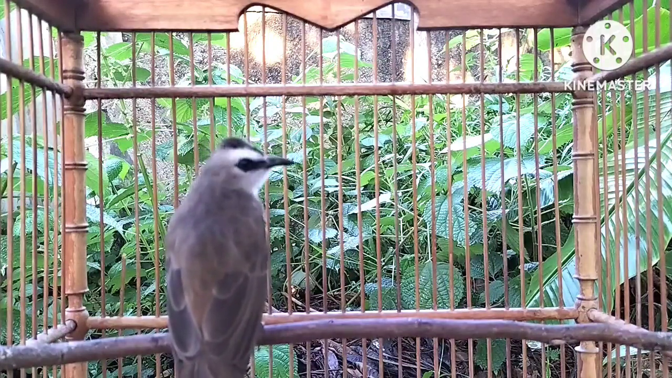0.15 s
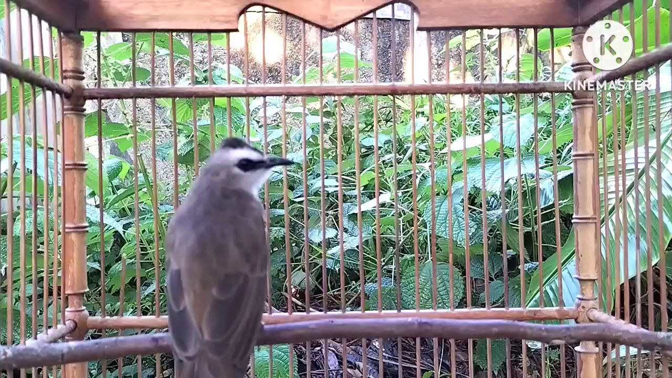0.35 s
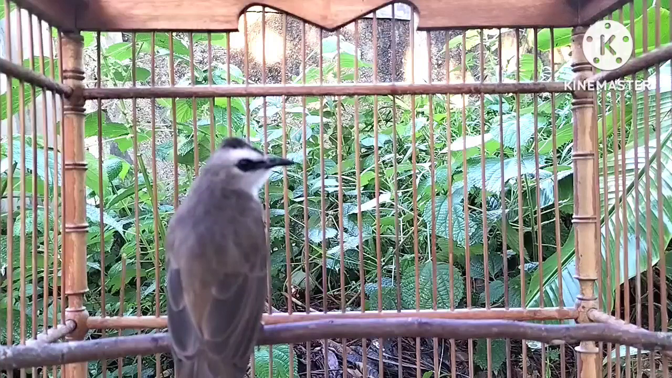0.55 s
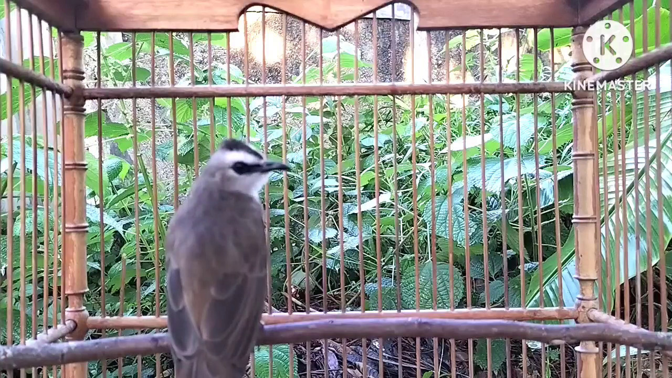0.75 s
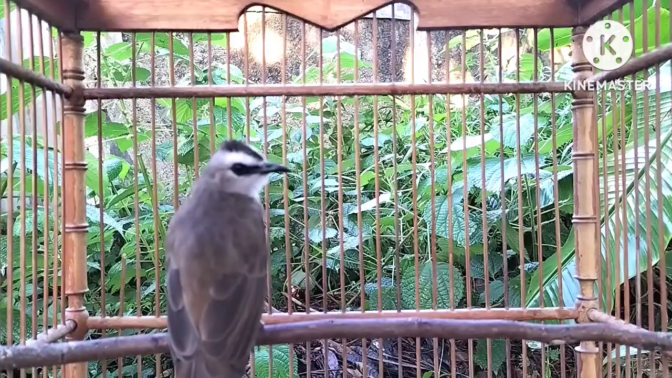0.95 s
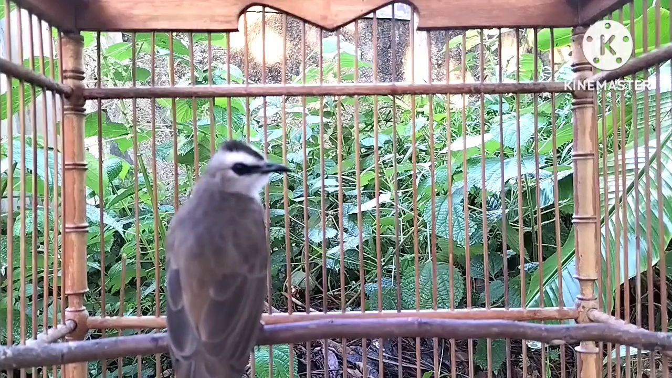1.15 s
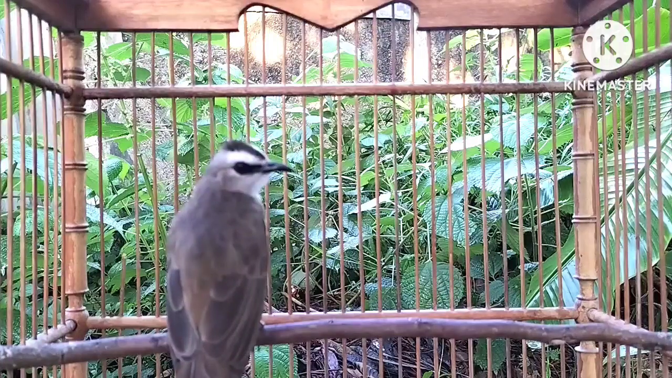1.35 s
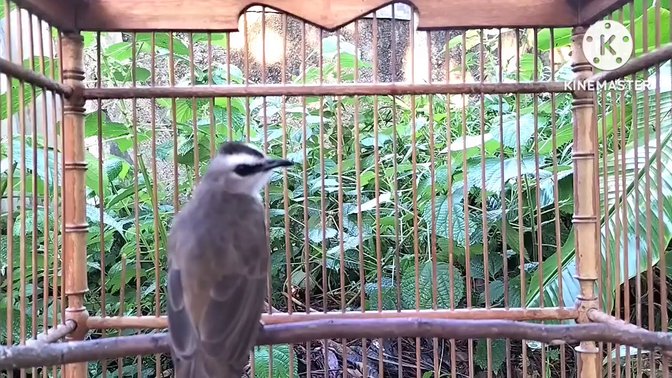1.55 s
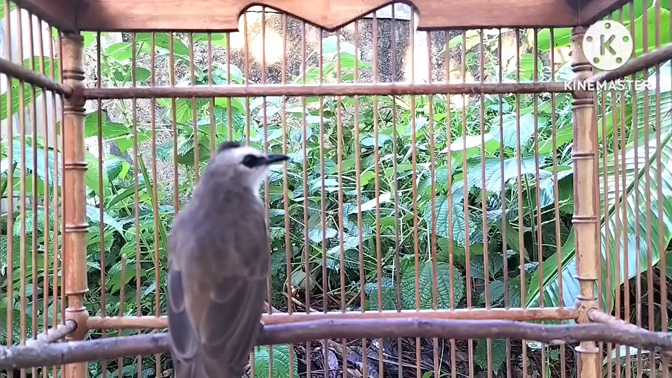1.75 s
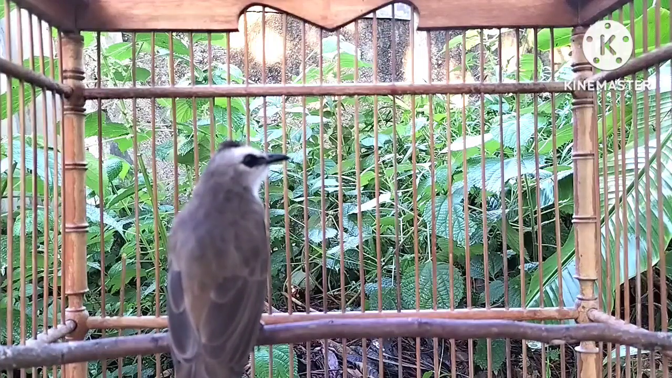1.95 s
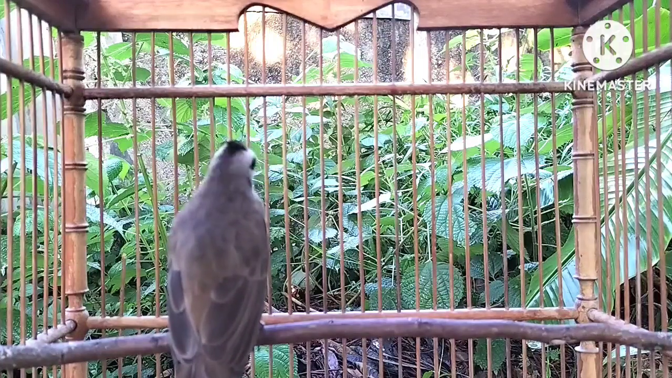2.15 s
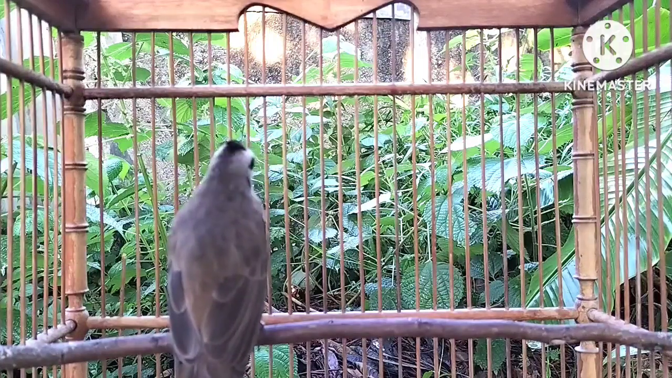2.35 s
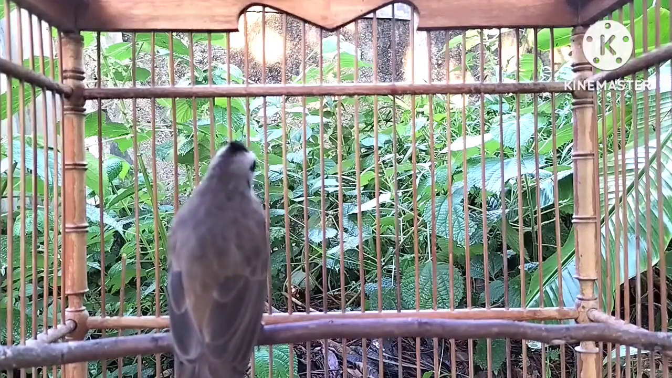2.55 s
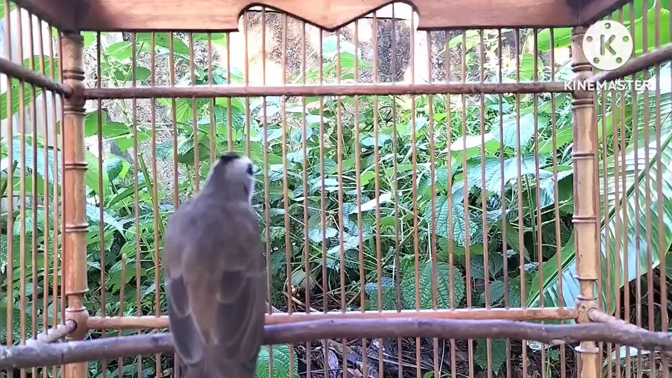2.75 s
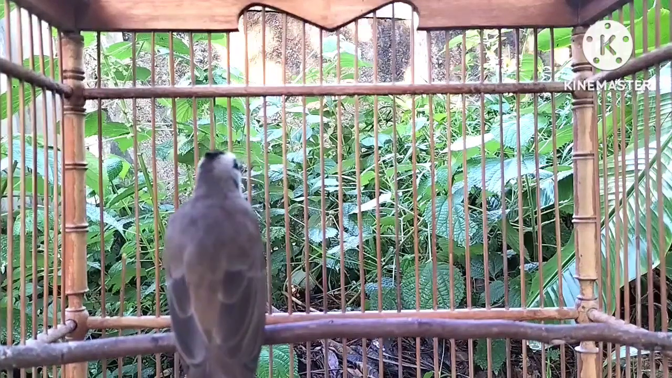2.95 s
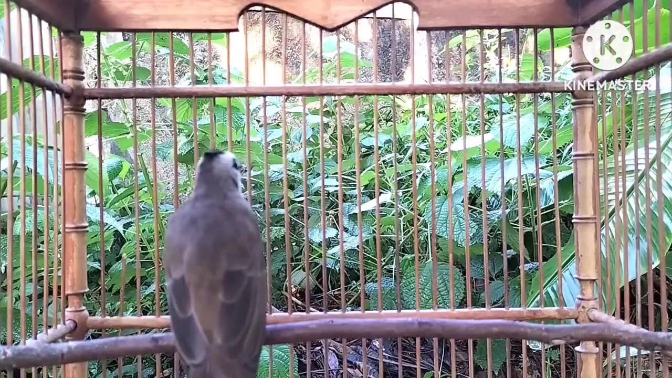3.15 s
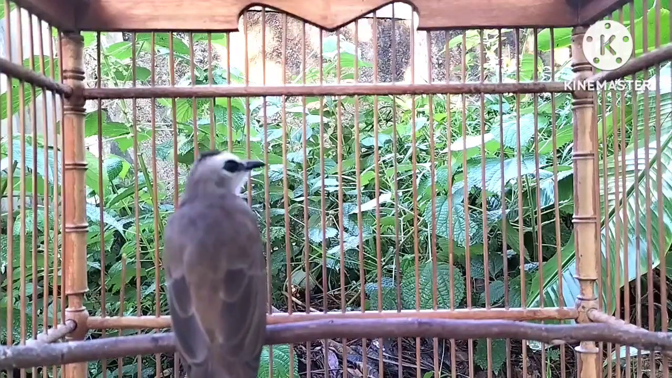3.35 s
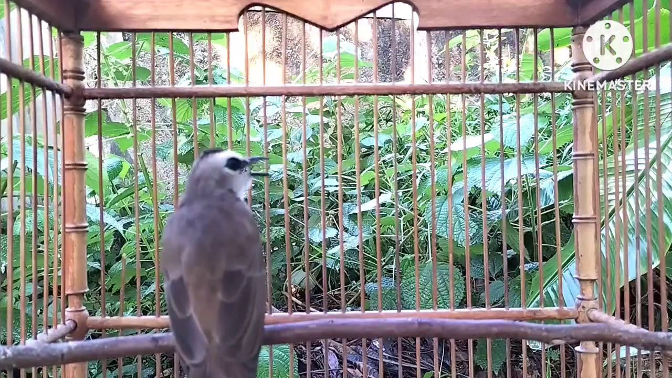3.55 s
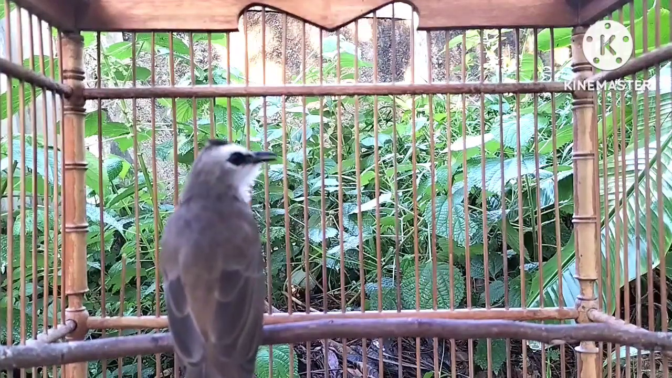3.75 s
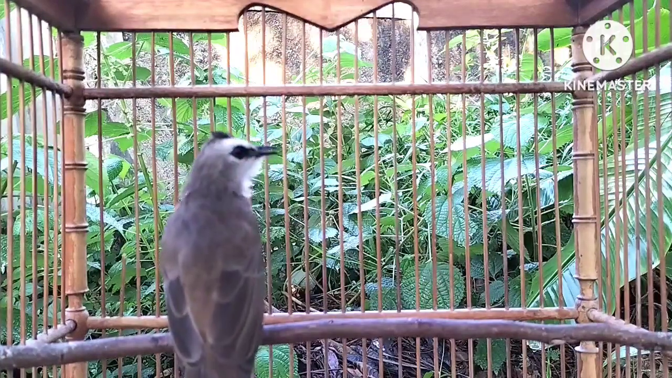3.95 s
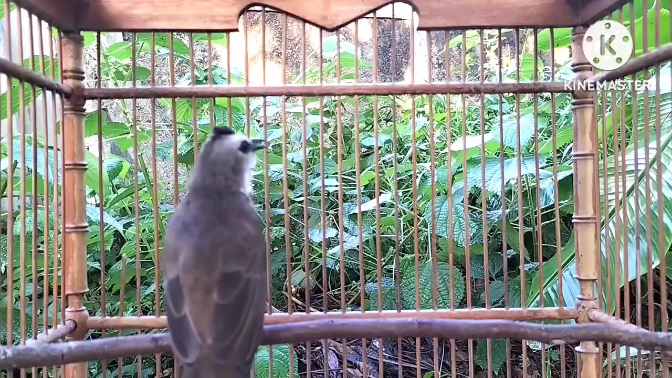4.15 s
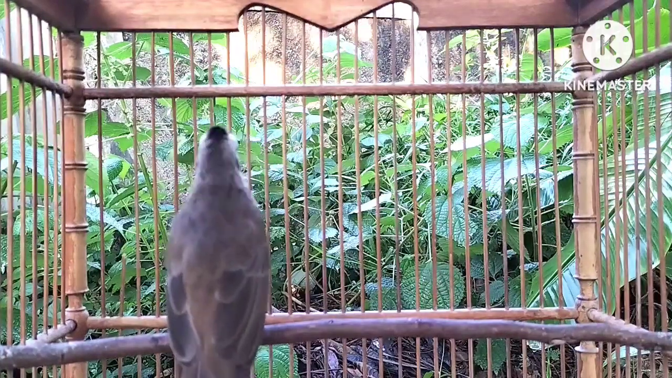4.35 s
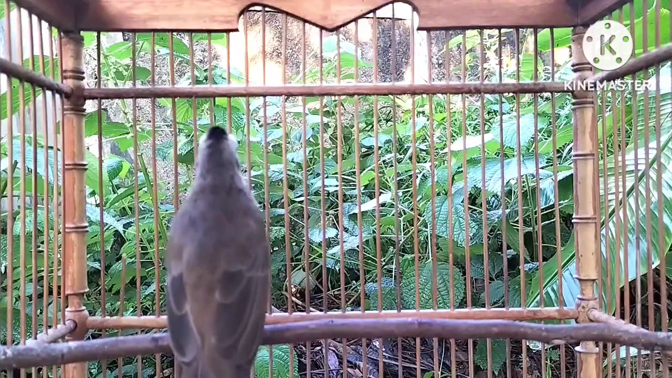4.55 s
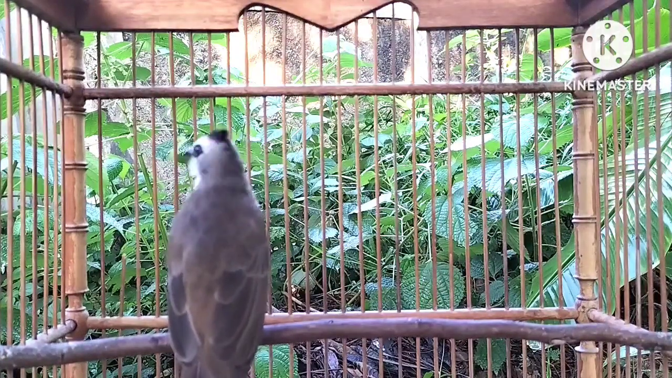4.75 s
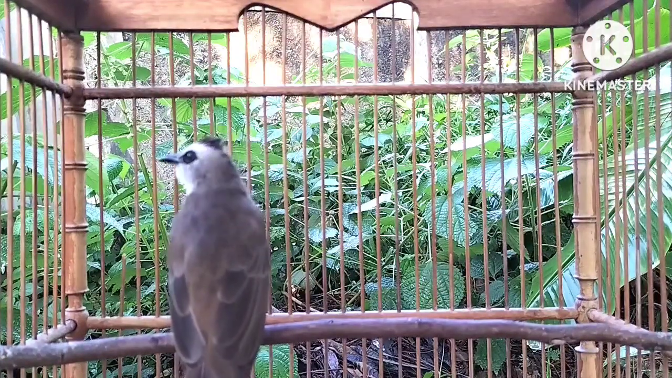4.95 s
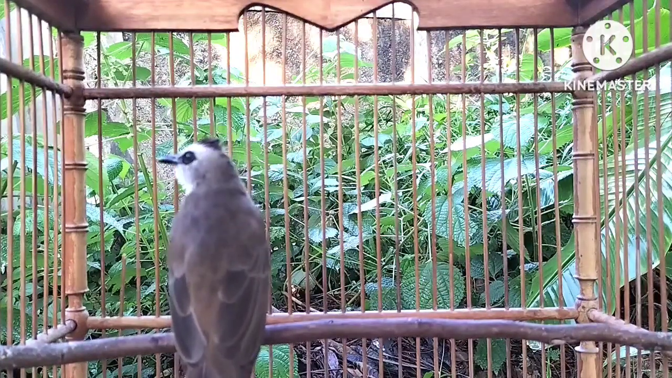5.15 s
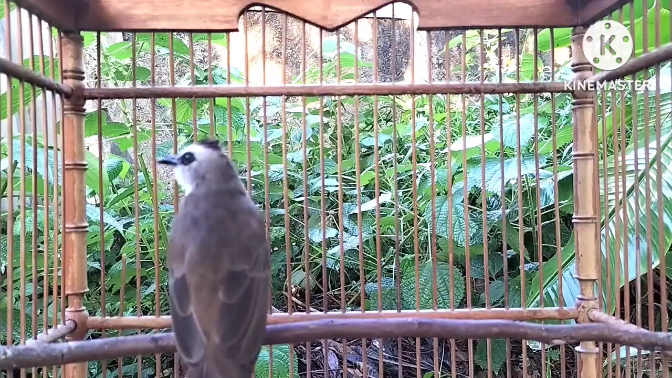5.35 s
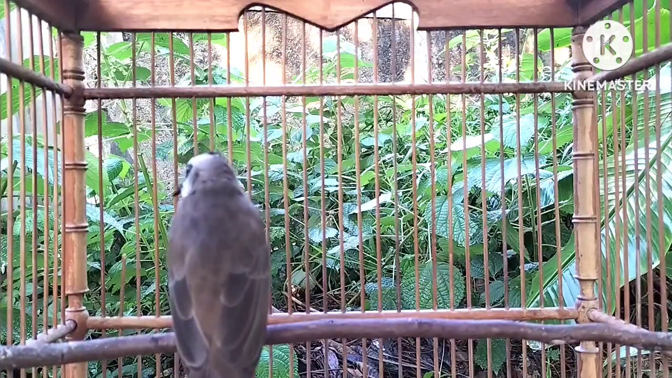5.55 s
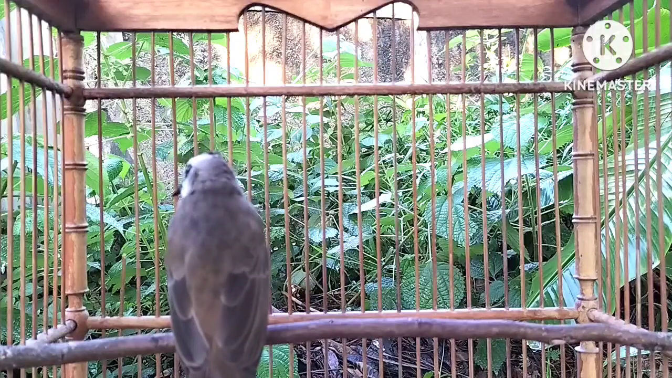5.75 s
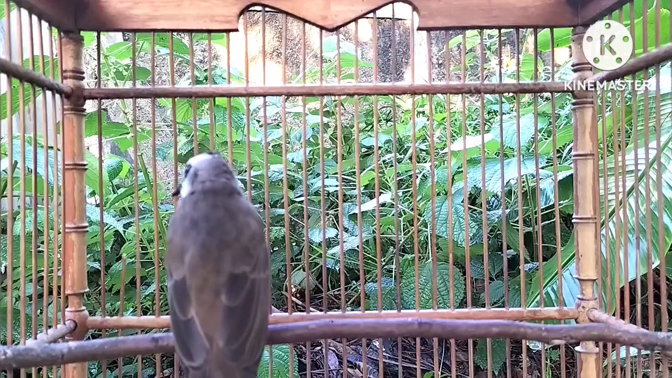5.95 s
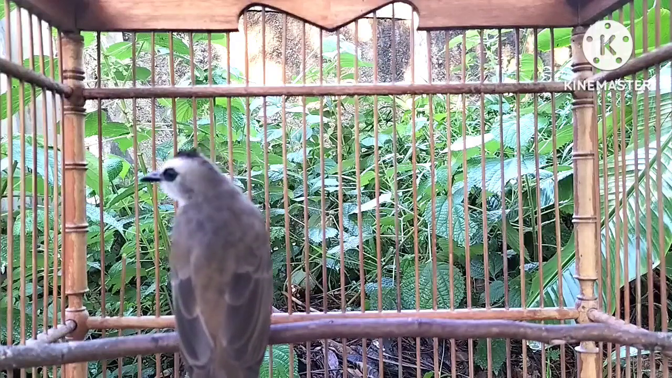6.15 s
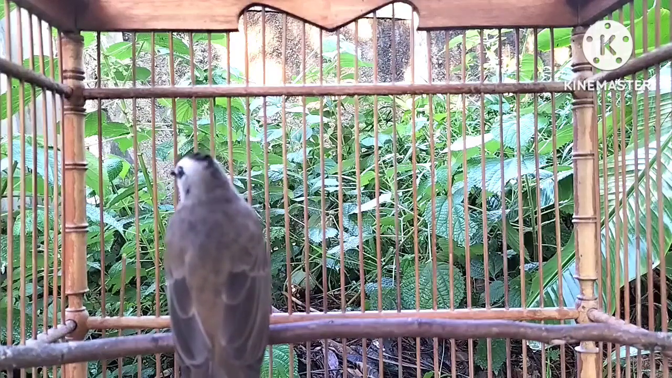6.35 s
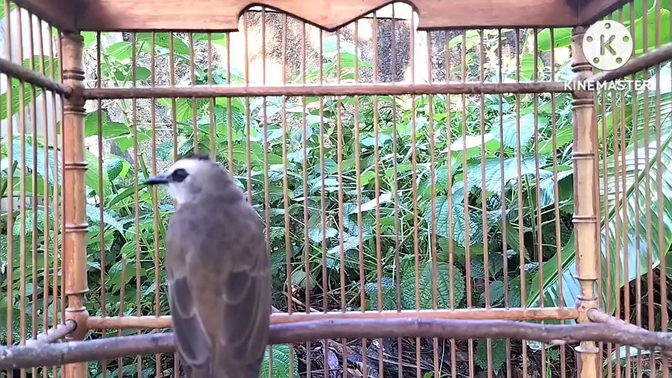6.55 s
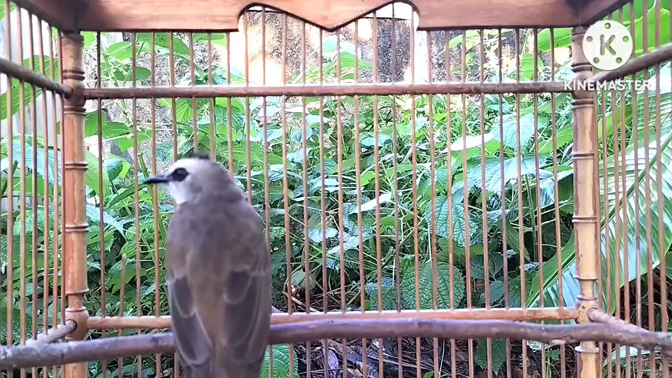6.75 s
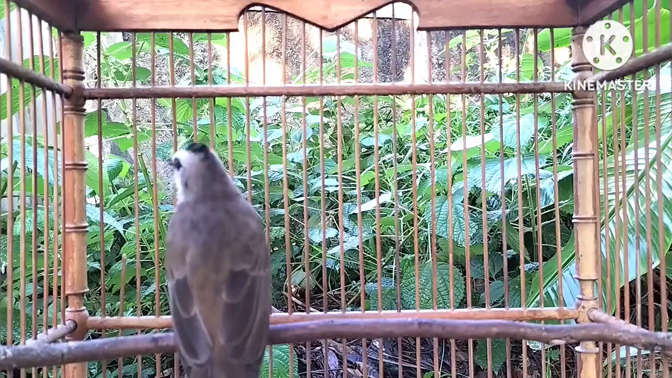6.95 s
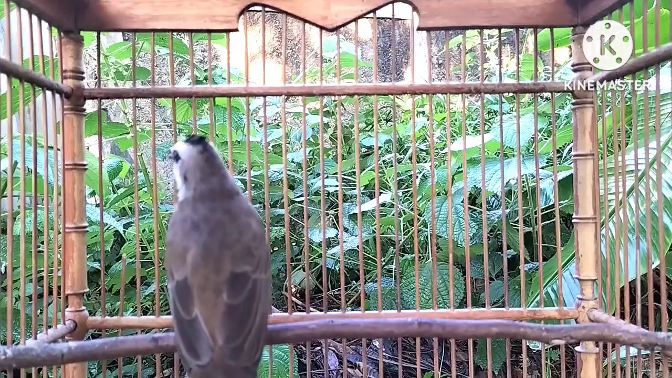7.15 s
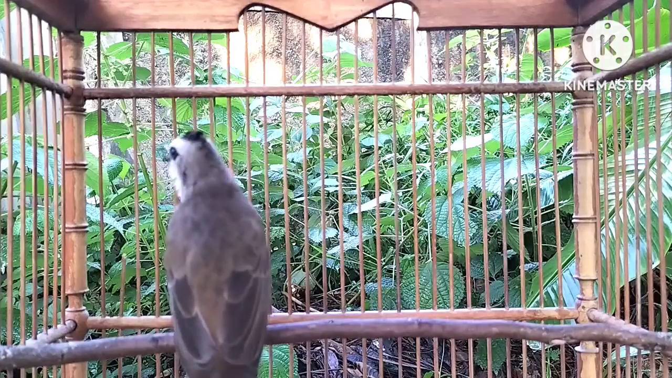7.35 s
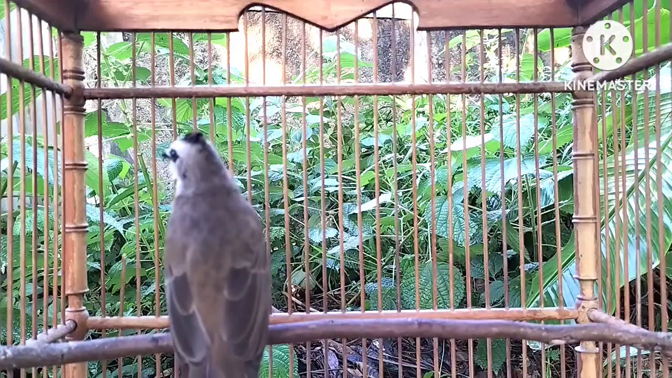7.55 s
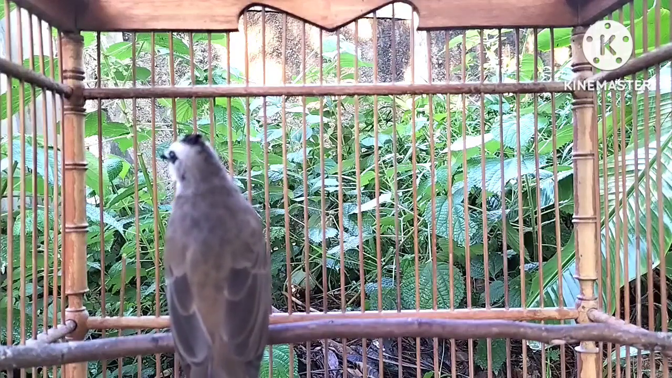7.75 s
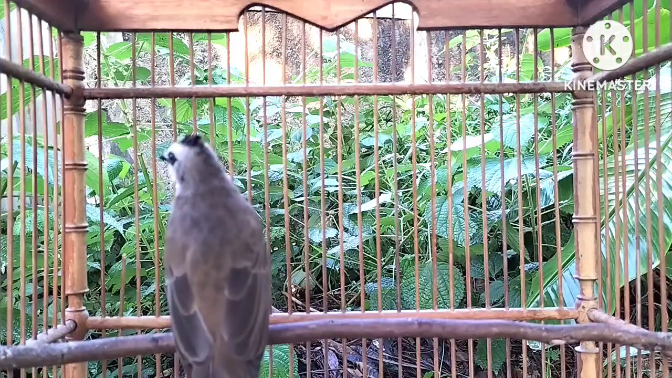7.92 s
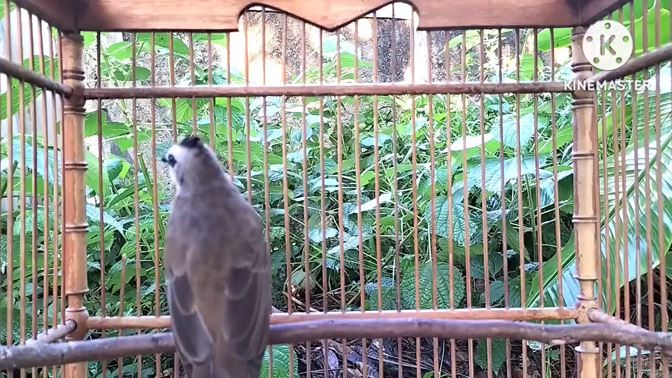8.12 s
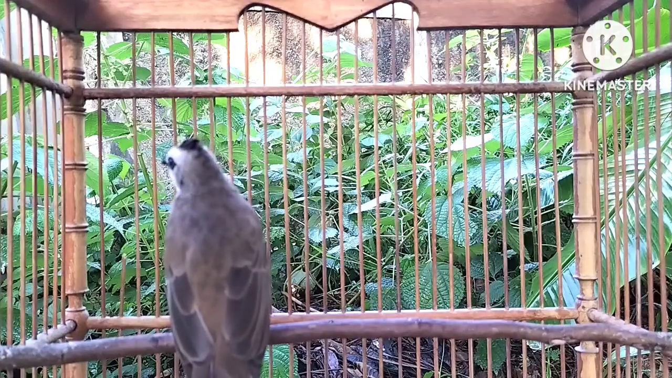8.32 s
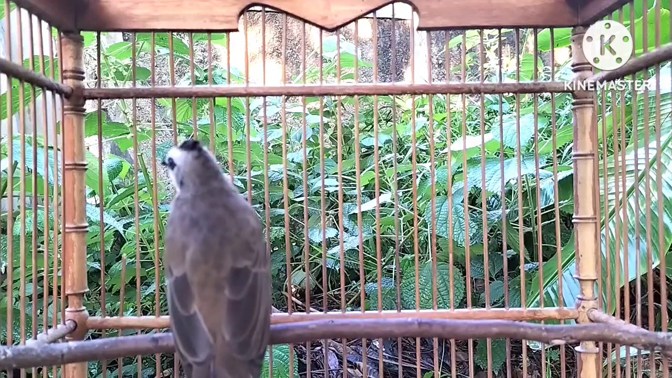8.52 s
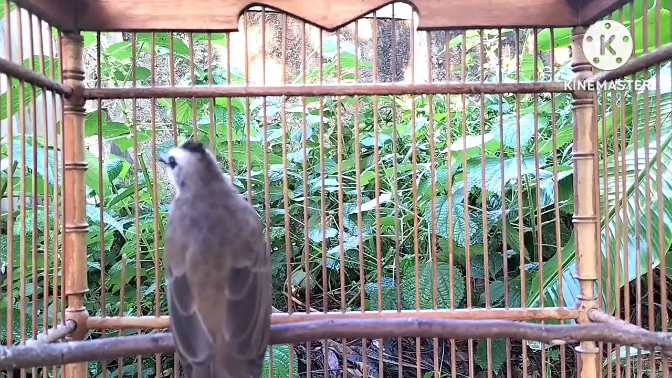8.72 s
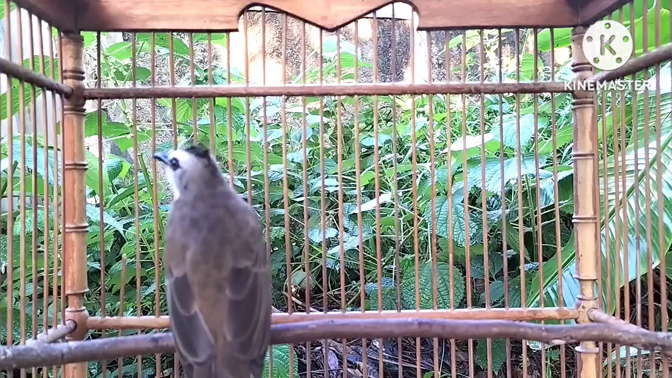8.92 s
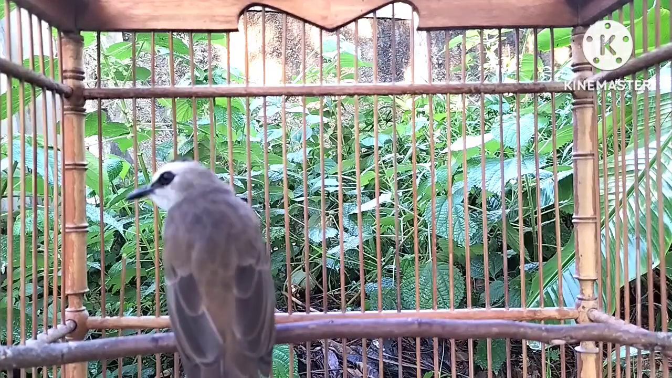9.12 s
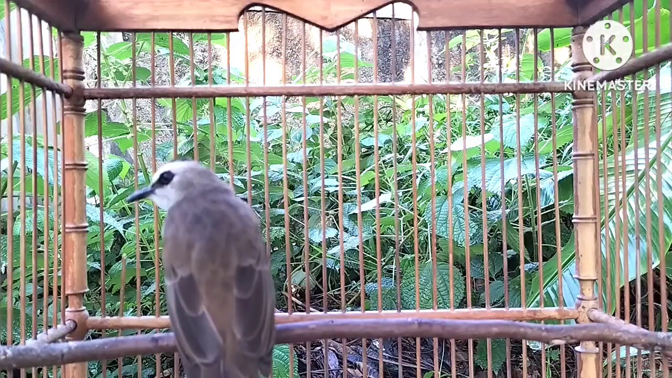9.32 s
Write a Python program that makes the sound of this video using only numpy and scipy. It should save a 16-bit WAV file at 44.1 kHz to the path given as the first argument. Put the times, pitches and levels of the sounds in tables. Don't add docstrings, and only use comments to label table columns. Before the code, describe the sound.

Caged songbird bursts into short, piercingly loud clipped notes twice, over faint crickets, dry cage ticks, soft rumble and distant birds in a garden.

```python
import sys
import numpy as np
from scipy import signal
from scipy.fft import rfft, irfft, next_fast_len
from scipy.io import wavfile
from scipy.ndimage import uniform_filter1d, map_coordinates

SR = 44100
rng = np.random.default_rng(int(sys.argv[2]) if len(sys.argv) > 2 else 0)


def file_out(sig):
    cols = np.atleast_2d(sig).T
    lim = np.clip(cols, -1, 1)
    pcm = np.round(lim * 32767).astype(np.int16)
    wavfile.write(sys.argv[1], SR, pcm)


def elevation(decibels):
    levels = np.asarray(decibels, float)
    return 10 ** (levels / 20)


N = 418068


def unit(x):
    return x / np.sqrt(np.mean(x ** 2) + 1e-20)


def along(points, hz):
    point_hz, value = np.transpose(points)
    return np.interp(np.log(hz + 1), np.log(point_hz + 1), value)


def curves(rows, t):
    s, *columns = np.transpose(rows)
    return [np.interp(t, s, column) for column in columns]


def wobble(rate, size=N):
    knots = rng.standard_normal(size=1000)
    return map_coordinates(knots, [np.arange(size) * rate / SR], mode="mirror")


def noise(response, size=N):
    m = next_fast_len(size)
    spectrum = rfft(rng.standard_normal(m)) * response(np.fft.rfftfreq(m, 1 / SR))
    return unit(irfft(spectrum, m)[:size])


def add(track, s, sound):
    part = track[round(s * SR):][:len(sound)]
    part += sound[:len(part)]


# pitch in Hz, time to die by 60 dB in seconds
GARDEN_DECAY = [(500, 0.5), (2200, .33), (3300, 0.29), (4300, .24), (8000, .22)]


def echoes(x, slow):
    seed = rng.standard_normal(int(SR * np.clip(slow / 2, .15, .5)))
    hz, t, z = signal.stft(seed, SR, nperseg=256)
    decay = elevation(-60 * t / (slow * along(GARDEN_DECAY, hz)[:, None]))
    tail = signal.istft(z * decay, SR, nperseg=256)[1]
    return signal.fftconvolve(np.pad(x, (300, 0)), tail / np.linalg.norm(tail))


# time in seconds, voice pitch in Hz, effort in dB
ARCHES = [
    [(3.745, 1330, -36), (3.752, 1700, -29), (3.757, 1870, -15), (3.761, 1600, -26), (3.764, 1460, -19),
     (3.768, 1200, -10), (3.772, 960, -21), (3.774, 900, -16), (3.783, 830, -36)],
    [(3.825, 1000, -34), (3.840, 1150, -22), (3.844, 1250, -10), (3.850, 1660, -6.5), (3.858, 1420, -6.5),
     (3.860, 1240, -12), (3.863, 1100, -2), (3.868, 850, -13), (3.878, 760, -30)],
]
# time in seconds, voice pitch in Hz, effort in dB
HOOTS = [
    [(7.084, 950, -36), (7.102, 915, -15.5), (7.106, 870, -19), (7.112, 905, -11), (7.118, 945, -10),
     (7.123, 965, -6.5), (7.134, 840, -21), (7.136, 900, -13), (7.141, 900, -34)],
    [(7.205, 950, -32), (7.220, 950, -14), (7.224, 885, -16), (7.227, 960, -8.5), (7.234, 970, -6),
     (7.242, 975, -5.5), (7.248, 975, -12), (7.252, 970, -22), (7.258, 970, -34)],
]
# time in seconds, voice pitch in Hz, effort in dB
CHOPS = [
    [(4.001, 930, -30), (4.017, 930, -12), (4.020, 1080, -3), (4.0225, 1450, 5.5), (4.031, 1350, 4),
     (4.0325, 1220, -4), (4.040, 1165, 5), (4.045, 1000, -9), (4.051, 950, -24)],
    [(4.166, 1100, -33), (4.1755, 1300, -7), (4.180, 940, -11), (4.1835, 1460, 5), (4.1865, 1330, -2),
     (4.188, 1170, 7), (4.202, 1090, 1), (4.208, 1015, -6), (4.213, 1015, -23)],
    [(4.340, 1000, -33), (4.351, 1450, -10), (4.355, 1760, -18), (4.3595, 1090, 1), (4.3625, 1070, -1),
     (4.3645, 1440, 4), (4.368, 1195, 7), (4.382, 1080, 2), (4.388, 1020, -17)],
]
# time in seconds, voice pitch in Hz, effort in dB
LAST_CHOPS = [
    [(7.356, 1020, -28), (7.367, 1000, -25), (7.370, 1470, -20), (7.375, 1190, -10), (7.379, 1100, 4),
     (7.383, 1050, 5), (7.394, 1039, 0), (7.399, 1034, -20)],
    [(7.527, 1000, -36), (7.538, 1000, -29), (7.540, 1700, -23), (7.545, 1030, 1), (7.547, 900, -12),
     (7.551, 1190, 6), (7.558, 1103, 7.5), (7.568, 1025, -1), (7.572, 1030, -20)],
]
# resting pitch at the start in Hz, at the end in Hz,
# odd harmonics at full effort in dB, time the voice clears in seconds
THROATS = [
    (3900, 3300, .8, 3.753),
    (3200, 3300, .9, 3.841),
    (2840, 2450, -30, 7.105),
    (2950, 2300, -29.5, 7.222),
    (2900, 2100, -18, 4.019),
    (2100, 2900, -20, 4.174),
    (2800, 2400, -25, 4.348),
    (2560, 2100, -26, 7.368),
    (2800, 1800, -28.5, 7.539),
]
# delay in seconds, level in dB
WALLS = [(.006, -28), (.012, -21), (.015, -26)]


def song():
    out, direct, k = np.zeros(N), np.zeros(N), np.arange(1, 11)[:, None]
    # share of the throat tied to harmonic 2 (0-1), gain of odd harmonics per dB below the peak
    kinds = [(ARCHES, (.0067, .02)), (HOOTS, (.0076, .25)), (CHOPS + LAST_CHOPS, (.7, .4))]
    notes = [(note, kind) for group, kind in kinds for note in group]
    for (note, kind), rest in zip(notes, THROATS):
        t, hz, db, throat_hz, odd_db, rasp = note_voice(note, *rest, *kind)
        partial_hz = k * hz
        off = partial_hz / throat_hz
        throat = off ** .92 / ((1 - off ** 2) ** 2 + (.3 * off) ** 2) ** .8
        throat = throat / (1 + (partial_hz / 5200) ** 6) ** .68
        beak_dip_db = -8 * np.exp(-((partial_hz - 5700) / 600) ** 2)
        size = throat * elevation(odd_db * (k % 2) - .8 * k + beak_dip_db)
        size = size / np.linalg.norm(size, axis=0)
        size = size / (1 + (900 / partial_hz) ** 5)
        flutter = np.array([wobble(1400, size=len(t)) + 1j * wobble(1400, size=len(t)) for _ in k])
        swing = (1 + 1.9 * rasp * flutter) * np.exp(2j * np.pi * k * np.cumsum(hz) / SR)
        voice = elevation(db) * signal.windows.tukey(len(t), .04) * np.sum(size * swing.real, axis=0)
        add(direct, t[0], voice)
        add(out, t[0], elevation(-31) * echoes(voice, slow=.97))
        add(out, t[0], elevation(-26) * echoes(voice, slow=.43))
        for lag, wall_db in WALLS:
            add(out, t[0] + lag, elevation(wall_db) * voice)
    air = soft_rush(direct)
    return out + direct + air + elevation(-15) * echoes(air, slow=.42)[:N]


def note_voice(note, throat0_hz, throat1_hz, odd_full_db, clear_s, tied, odd_gain):
    t = np.arange(note[0][0], note[-1][0], 1 / SR)
    hz, db = (uniform_filter1d(c, size=25) for c in curves(note, t))
    croak = np.clip((clear_s - t) / .002 + .5, 0, 1)
    below = db.max() - db
    share = tied * (1 - croak)
    rest_hz = np.linspace(throat0_hz, throat1_hz, len(t))
    throat_hz = share * 2 * hz + (1 - share) * rest_hz
    clear_odd_db, croak_odd_db = np.minimum(odd_full_db + odd_gain * below, 3), .3
    odd_db = (1 - croak) * clear_odd_db + croak * croak_odd_db
    rasp = .013 + .13 * croak + .004 * below
    return t, hz, db, throat_hz, odd_db, rasp


def soft_rush(voice):
    push = uniform_filter1d(np.abs(voice), size=200)
    lead = signal.lfilter([.004], [1, -.9962], push[::-1])[::-1]
    band = noise(lambda f: np.exp(-(np.log((f + 1) / 2600) / .55) ** 2))
    level = elevation(-24) * np.maximum(lead - push, 0) + elevation(-30) * push
    return level * elevation(4 * wobble(300)) * band


# start in seconds, length in seconds, level in dB
RISING = [(0, .045, -47), (.082, .12, -51), (.24, .11, -51), (.394, .115, -51.5), (.553, .11, -49.5),
          (.709, .115, -50.5), (.872, .12, -51.5), (1.036, .115, -52), (1.208, .135, -51),
          (1.398, .15, -50), (1.622, .185, -49.5), (1.884, .17, -49), (2.138, .185, -49), (2.392, .18, -50),
          (2.666, .185, -49)]
# start in seconds, length in seconds, pitch in Hz, level in dB
PEEPS = [(.01, 0.018, 2264, -57), (.06, .025, 2450, -56), (.57, .034, 2434, -60), (.65, 0.028, 2040, -62),
         (.89, 0.027, 1780, -60), (.95, 0.11, 4350, -70), (1.11, .07, 4470, -74), (1.11, .045, 2415, -55.5),
         (1.18, .03, 3200, -60), (1.357, .032, 2560, -52), (1.2, .06, 730, -62), (2.15, .04, 1110, -61),
         (3.17, .22, 1570, -71.5), (3.3, 0.23, 1330, -60.5), (5.0, 0.086, 878, -66),
         (6.77, 0.031, 813, -59.5), (7.89, 0.06, 1310, -59), (8.44, 0.026, 2203, -60.5),
         (8.86, 0.017, 3550, -58), (9.04, 0.061, 4480, -70)]
# start in seconds, length in seconds, first pitch in Hz,
# last pitch in Hz, level in dB
GLIDES = [
    (.33, .06, 1900, 2010, -63),
    (3.738, .012, 4850, 5150, -46),
    (7.573, .075, 4170, 3740, -47.5),
    (8.804, .02, 4070, 4650, -44.5),
    (8.809, .06, 4600, 4790, -41),
    (8.855, 0.07, 4790, 4610, -40),
    (8.93, .09, 3870, 3490, -50.5),
]
# start in seconds, length in seconds, first pitch in Hz,
# last pitch in Hz, level in dB
FLOCK = [
    (.07, .09, 3900, 4340, -71),
    (1.45, .1, 3950, 4500, -70),
    (1.93, .09, 3920, 4300, -73),
    (2.25, 0.087, 3850, 3700, -81),
    (2.33, 0.054, 3520, 3420, -79),
    (2.41, 0.064, 4480, 4210, -71),
    (2.43, .06, 5200, 4840, -79),
    (2.49, .1, 4020, 4320, -79),
    (2.615, 0.046, 5060, 5200, -80),
]


def far_birds():
    top_hz, rise_hz_per_s = 3070, 3800
    rising = [(s, length, top_hz - rise_hz_per_s * length, top_hz, db) for s, length, db in RISING]
    level = [(s, length, hz, hz, db) for s, length, hz, db in PEEPS]

    def s_curve(u):
        return np.sin(np.pi / 2 * np.minimum(u / .8, 1)) ** 1.8

    def straight(u):
        return u

    slides = whistles(rising, s_curve, shake=.013, wet_db=6, slow=.75, grow_db=3)
    glides = whistles(GLIDES, straight, shake=.004, wet_db=-7, slow=1.1)
    flock = whistles(FLOCK, straight, shake=.02, wet_db=4, slow=2.2)
    peeps = whistles(level, straight, shake=.006, wet_db=-4, slow=.7)
    return slides + glides + flock + peeps


def whistles(rows, bend, shake, wet_db, slow, grow_db=0):
    out = np.zeros(N)
    for s, length, hz0, hz1, db in rows:
        u = np.arange(int(length * SR)) / (length * SR)
        hz = (hz0 + (hz1 - hz0) * bend(u)) * (1 + shake * wobble(90, size=len(u)))
        swell = np.sin(np.pi * u) ** .6 * elevation(350 * shake * wobble(110, size=len(u)))
        note = elevation(db + grow_db * (u - 1)) * swell * np.sin(2 * np.pi * np.cumsum(hz) / SR)
        add(out, s, note)
        wet = echoes(note, slow)
        add(out, s, elevation(wet_db) * wet * np.linalg.norm(note) / np.linalg.norm(wet))
    return out


# first chirp in seconds, last in seconds, seconds per chirp, level in dB
BOUTS = [
    (.045, .66, .0606, -56),
    (.887, 1.44, .0605, -54.5),
    (1.621, 2.46, .0597, -53.5),
    (2.698, 2.77, .06, -56),
    (3.003, 6.14, .0591, -57.5),
    (6.46, 8.65, .059, -58),
    (8.878, 9.13, .06, -56),
    (9.187, 9.4, .064, -54),
]


def crickets():
    t, gate = np.arange(N) / SR, np.zeros(N)
    chirp_s = .036
    chirp = np.sin(np.pi * np.arange(int(chirp_s * SR)) / (chirp_s * SR)) ** .8
    for first, last, period, db in BOUTS:
        for s in np.arange(first, last, period):
            add(gate, s - .004, elevation(db) * chirp)
    near = gate * elevation(2.2 * wobble(25)) * np.sin(2 * np.pi * 7865 * t + .6 * wobble(40))
    trill_db = -71.5 - 4.8 * (t < 2.9) + 4.5 * wobble(25)
    trill = elevation(trill_db) * np.sin(2 * np.pi * 7360 * t + .8 * wobble(30))
    chorus = elevation(-67.5 + 1.2 * wobble(4.1)) * noise(lambda f: np.exp(-((f - 7700) / 420) ** 2))
    return near + trill + chorus


# time in seconds, peak level in dB
CLAWS = [(.4116, -56), (.651, -30.5), (.7049, -44), (.87, -47), (.89, -51), (.9344, -50), (.9563, -30),
         (1.0726, -44), (1.2028, -36), (1.2372, -46), (1.3305, -49), (1.3794, -33), (1.8383, -35.5),
         (1.9326, -44), (2.0384, -37.5), (3.5294, -54), (4.5788, -56), (4.592, -52), (4.6426, -55),
         (4.7748, -52), (5.802, -53.5), (6.0325, -55), (6.1746, -53), (6.1981, -44.5), (6.223, -42),
         (8.1314, -47.5), (9.3232, -50)]
# time in seconds, peak level in dB
BARS = [(.5278, -36), (.154, -48), (1.1025, -50), (1.17, -51), (1.3489, -41), (1.546, -51), (1.6213, -25.5),
        (1.7326, -37.5), (2.1052, -27), (2.1666, -39), (5.0432, -57), (5.125, -59), (6.2545, -35),
        (6.302, -40), (6.312, -47), (6.5747, -55.5), (7.309, -27), (7.6794, -44), (8.6472, -38),
        (8.7385, -58.5)]
# time in seconds, peak level in dB
KNOCKS = [(1.272, -56), (1.362, -54), (1.4532, -52), (1.4787, -46), (1.6907, -40), (1.7825, -55),
          (1.8, -54), (1.965, -56), (1.8817, -52), (2.0743, -55), (3.004, -54.5), (4.6755, -53.5),
          (5.1839, -51), (5.2053, -52.5), (5.2278, -54), (5.2487, -46.5), (5.3291, -45), (6.8262, -53.5),
          (7.338, -27), (7.7134, -52), (7.7742, -38), (8.0544, -56)]


def ticks():
    out, t = np.zeros(N), np.arange(SR // 40) / SR
    # main pitch in Hz, level of the low modes in dB
    kinds = [(CLAWS, (3800, -16)), (BARS, (5900, -14)), (KNOCKS, (3700, 7))]
    rows = [(*hit, *tone) for hits, tone in kinds for hit in hits]
    for (s, db, hz, low_db), draw in zip(rows, rng.random((len(rows), 12))):
        spread = np.append(0, draw[:5] - .5)[:, None]
        modes_hz = hz * 2.5 ** spread
        high_db = -60 * t / .014 - 11 * np.abs(spread) - 3.6 * draw[6:, None]
        high = np.sin(2 * np.pi * modes_hz * t) / (1 + (modes_hz / 7600) ** 8) * elevation(high_db)
        low_hz = 950 + 900 * draw[3:9, None]
        low = np.sin(2 * np.pi * low_hz * t) * elevation(-60 * t / .034 - 13 * draw[:6, None])
        crack = noise(lambda f: np.exp(-((f - 5000) / 2300) ** 4), size=len(t)) * elevation(2.5 - 60 * t / .0081)
        snap = crack + high.sum(axis=0) + elevation(low_db) * low.sum(axis=0)
        add(out, s, elevation(db - 8.5) * (1 - np.exp(-t / .00021)) * snap)
    return out + elevation(-12) * echoes(out, slow=.35)[:N]


# start in seconds, length in seconds, centre in Hz, width in Hz, level in dB
PUFFS = [
    (2.99, 0.42, 9200, 2200, -72),
    (6.17, 0.23, 3800, 2000, -56.5),
    (8.736, 0.033, 5100, 1204, -64.5),
    (2.24, 0.081, 5700, 790, -63.5),
    (9.142, 0.13, 7100, 280, -56),
    (9.385, 0.11, 7130, 360, -51),
    (9.32, 0.073, 3500, 500, -68.5),
]
# start in seconds, level in dB
LEAD_INS = [(3.727, -61.5), (3.808, -44), (3.981, -45), (3.993, -42), (4.142, -41), (4.317, -41),
            (4.328, -46), (7.064, -48.5), (7.078, -39), (7.187, -46), (7.195, -49), (7.519, -47)]


def puffs():
    out = np.zeros(N)
    clicks = [(s, .01, 2320, 710, db) for s, db in LEAD_INS]
    for s, length, hz, width_hz, db in PUFFS + clicks:
        u = np.arange(int(length * SR)) / (length * SR)
        grain = elevation(db + 2.6 * wobble(52.5, size=len(u))) * np.sin(np.pi * u ** .51) ** .92
        hiss = noise(lambda f: np.exp(-((f - hz) / width_hz) ** 2), size=SR)
        add(out, s, grain * hiss[:len(u)])
    return out


# time in seconds, firing rate in Hz, level in dB
ENGINE = [(0.0, 61.1, -61), (0.08, 61.5, -57), (0.21, 72.1, -52.5), (0.89, 72.0, -49.5),
          (2.35, 76.0, -49.5), (2.66, 76.1, -54), (2.75, 78.7, -54)]
# pitch in Hz, level in dB per Hz
TRAFFIC = [(12, -46.5), (20, -18.5), (90, 0), (153, 0), (370, -11.5), (967, -25.5), (1800, -36.5),
           (3960, -120)]
# time in seconds, level in dB
PASSING = [(0, -49.5), (1.2, -48.5), (3, -49), (4.5, -49), (9.48, -50.5)]
# pitch in Hz, level in dB per Hz
AIR = [(900, -32.5), (1600, -3.5), (4000, -1), (4600, -9), (8600, -5), (10700, -11), (11500, -21),
       (16000, -35.5)]
# start in seconds, end in seconds, level in dB
INSECTS = [
    (-.5, 2.7, -81),
    (6.4, 10, -86.5),
]


def background():
    t = np.arange(N) / SR
    hz, db = curves(ENGINE, t)
    beat = np.sin(2 * np.pi * np.cumsum(hz) / SR + .48 * wobble(23))
    roughness = .1 * noise(lambda f: np.exp(-((f - 55) / 20) ** 2))
    engine = elevation(db + 4 + 1.6 * wobble(8.38)) * (beat + roughness) * (t < ENGINE[-1][0] + .1)
    traffic_db = curves(PASSING, t)[0] + .66 * wobble(3.4)
    traffic = elevation(traffic_db) * noise(lambda f: elevation(along(TRAFFIC, f)))
    air_db = -71 + 3 * (t < 2.805)
    hiss = patchy(noise(lambda f: elevation(along(AIR, f))), depth_db=1)
    air = elevation(air_db + .69 * wobble(7.6)) * hiss
    singing = sum(elevation(db) * (t > first) * (t < last) for first, last, db in INSECTS)
    singing = uniform_filter1d(singing, size=8000) + elevation(-97)
    wings = noise(lambda f: np.exp(-((f - 15000) / 500) ** 2) + .3 * np.exp(-((f - 12000) / 900) ** 2))
    insects = singing * elevation(2.5 * wobble(90) + 3 * wobble(14)) * wings
    return engine + traffic + air + insects


def patchy(x, depth_db):
    z = signal.stft(x, nperseg=512)[2]
    field = uniform_filter1d(rng.standard_normal(z.shape), size=7, axis=0)
    field = uniform_filter1d(field, size=10, axis=1)
    return unit(signal.istft(z * elevation(depth_db * unit(field)), nperseg=512)[1][:N])


def scene():
    return (song() + far_birds() + crickets() + ticks() + puffs() + background())[None]


def band_limit(x):
    return signal.sosfilt(signal.butter(12, 15530, fs=SR, output="sos"), x)


# start in seconds, length in seconds, level in dB
THUMPS = [
    (4.025, 0.0097, -40.5),
    (4.18, 0.012, -30),
    (4.37, 0.014, -47.5),
    (7.386, 0.013, -37),
    (7.554, 0.021, -48),
]


def record(dry):
    bent = dry + .009 * dry ** 2
    flattened = bent / (1 + np.abs(bent / .93) ** 20) ** (1 / 20)
    for s, length, db in THUMPS:
        add(flattened[0], s, elevation(db) * signal.windows.tukey(int(length * SR), .2))
    t = np.arange(N) / SR
    out_s, out_length_s, in_s, in_db_per_s = 2.805, .11, 3.0, 697
    fade_out = np.clip((out_s - t) / out_length_s, 0, 1) ** 1.5
    fade_in = elevation(np.minimum(in_db_per_s * (t - in_s), 0)) * (t > out_s + .1)
    mix = flattened * elevation(.65) * (fade_out + fade_in)
    return band_limit(mix)


dry = scene()
out = record(dry)
file_out(out)
```